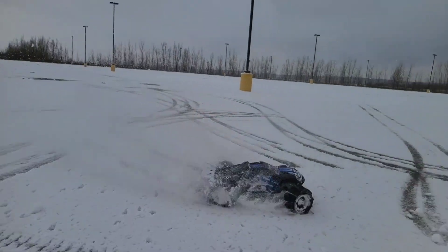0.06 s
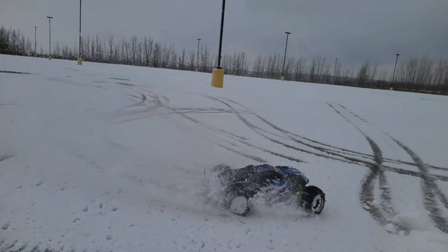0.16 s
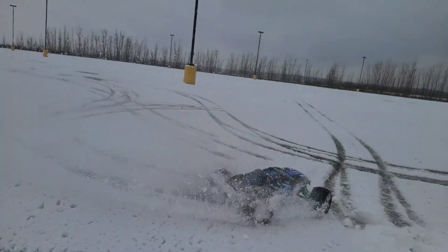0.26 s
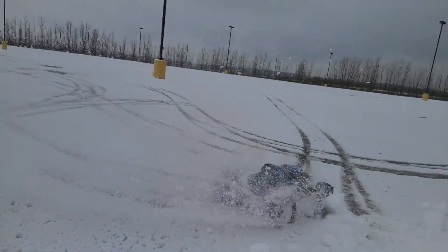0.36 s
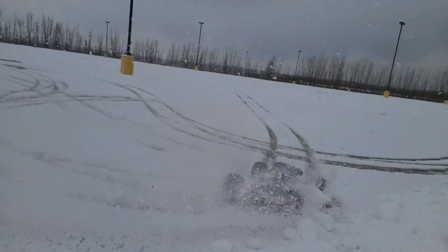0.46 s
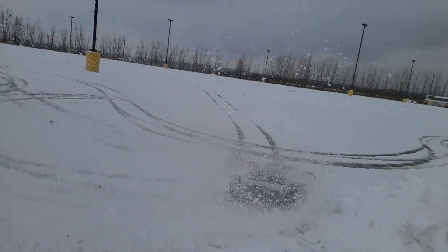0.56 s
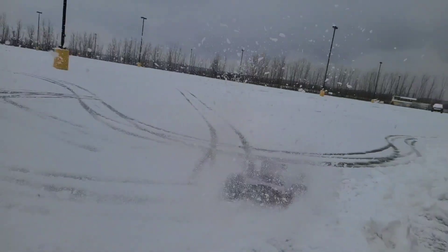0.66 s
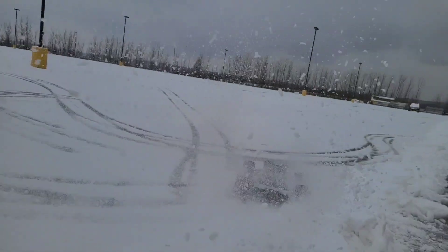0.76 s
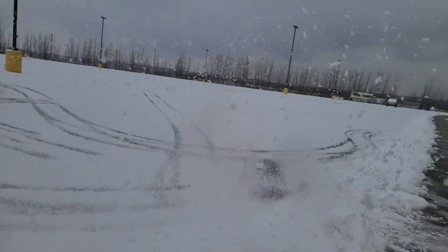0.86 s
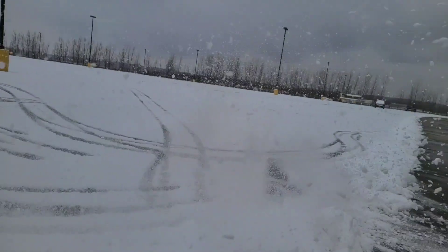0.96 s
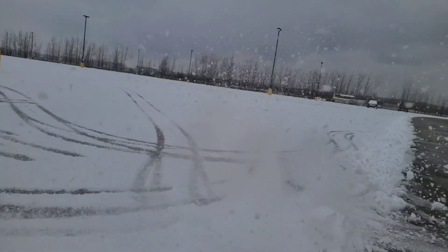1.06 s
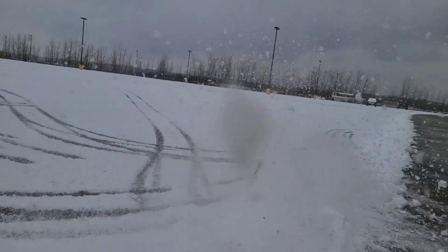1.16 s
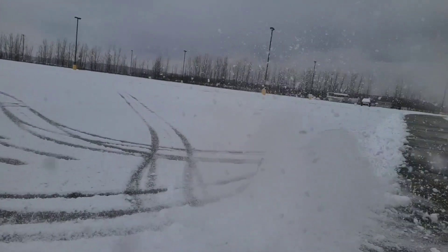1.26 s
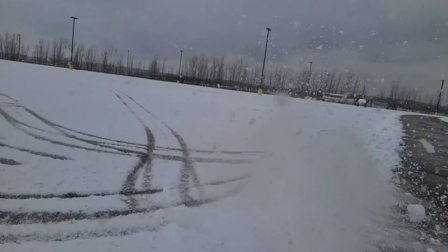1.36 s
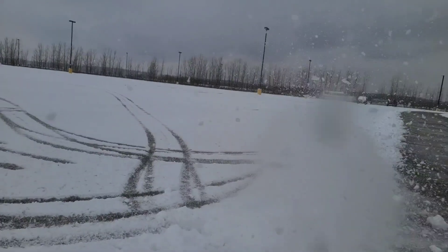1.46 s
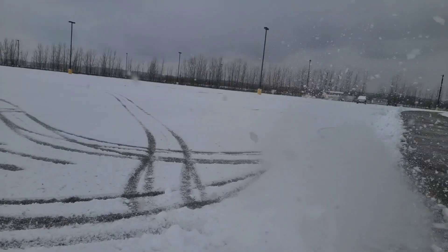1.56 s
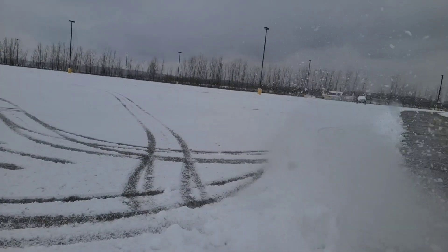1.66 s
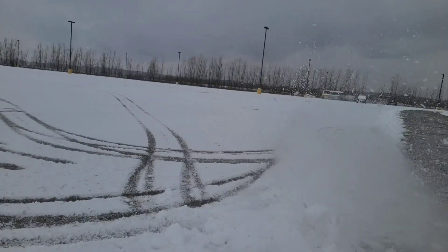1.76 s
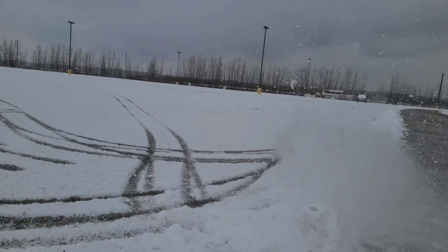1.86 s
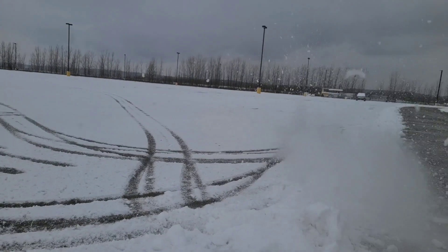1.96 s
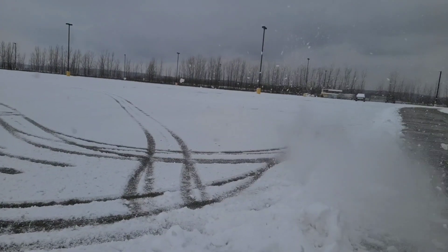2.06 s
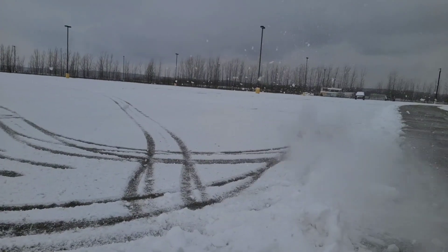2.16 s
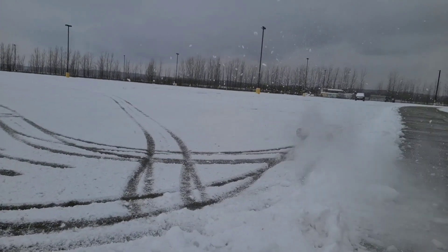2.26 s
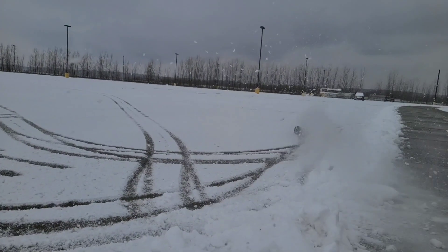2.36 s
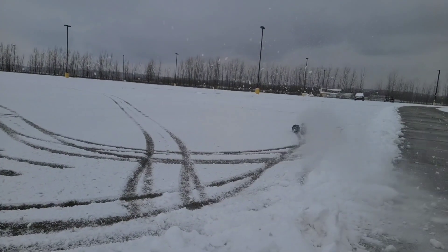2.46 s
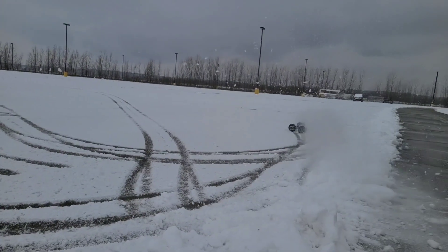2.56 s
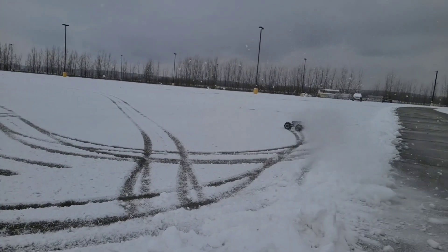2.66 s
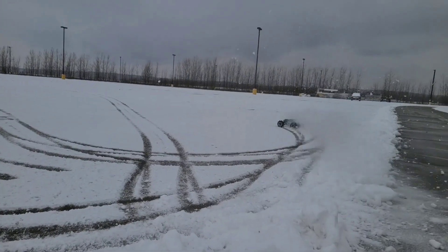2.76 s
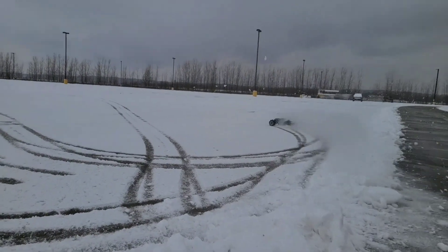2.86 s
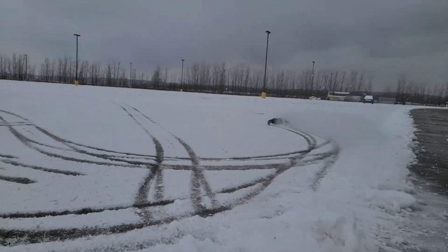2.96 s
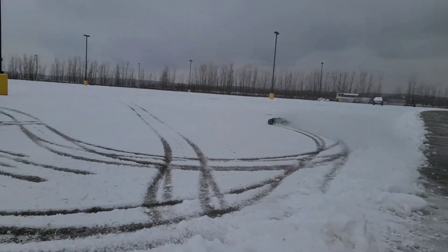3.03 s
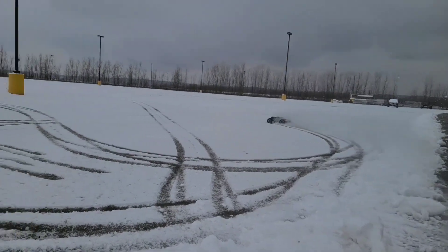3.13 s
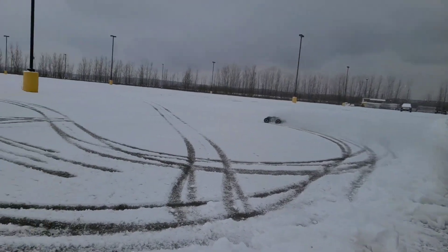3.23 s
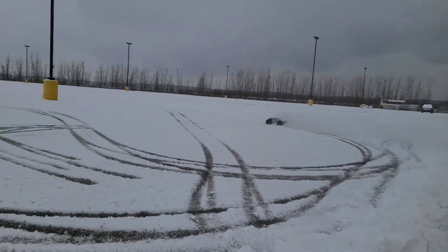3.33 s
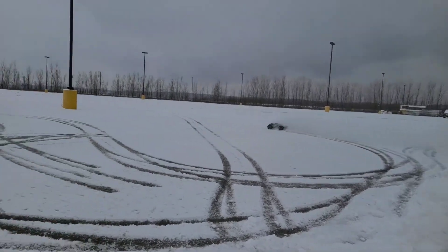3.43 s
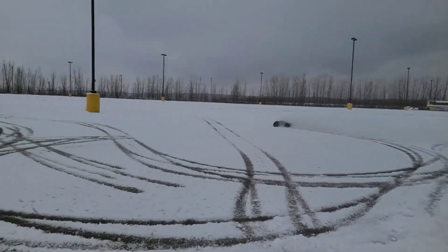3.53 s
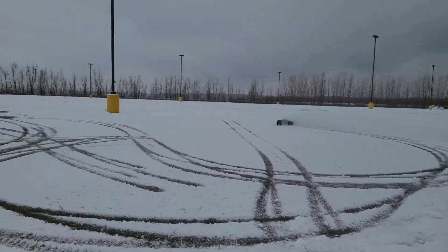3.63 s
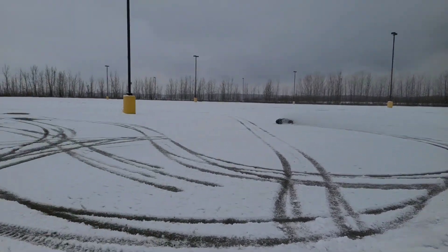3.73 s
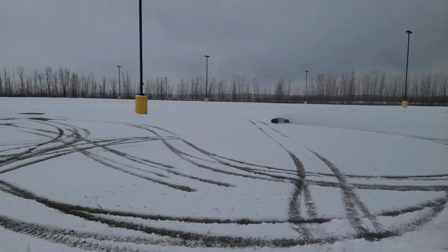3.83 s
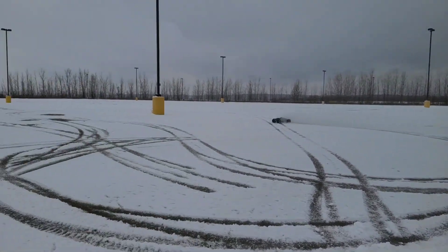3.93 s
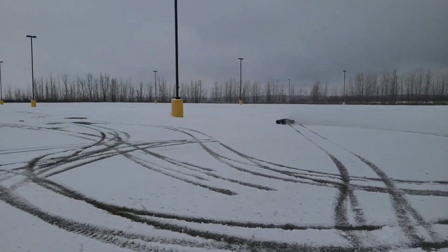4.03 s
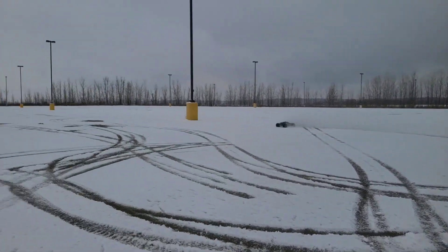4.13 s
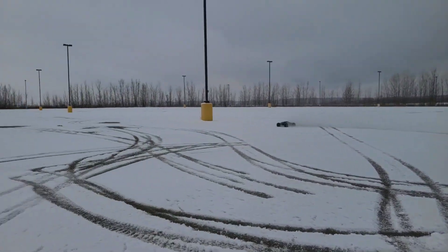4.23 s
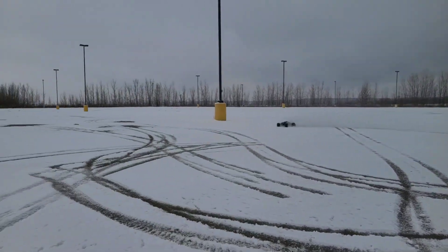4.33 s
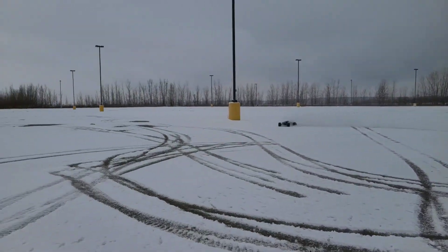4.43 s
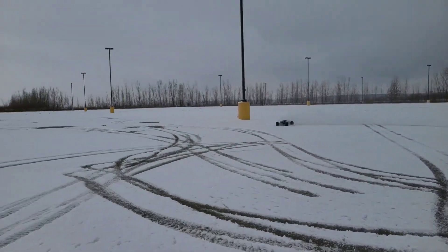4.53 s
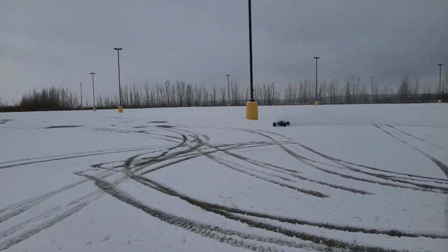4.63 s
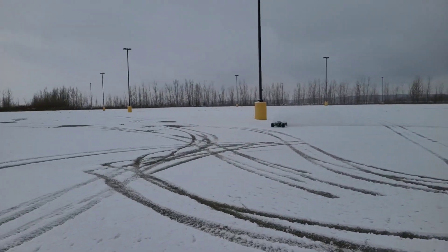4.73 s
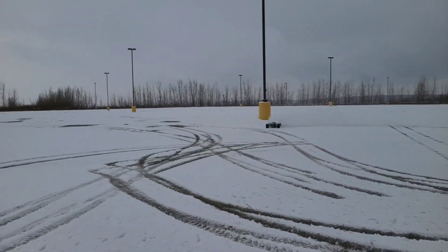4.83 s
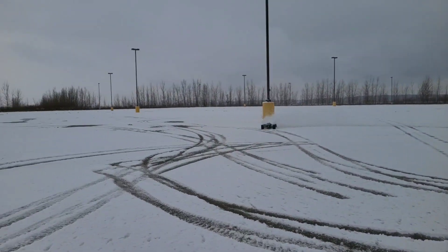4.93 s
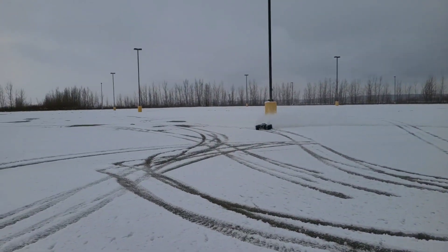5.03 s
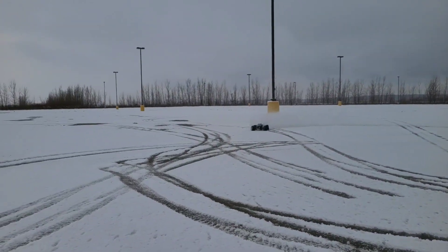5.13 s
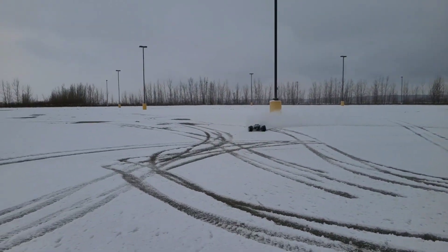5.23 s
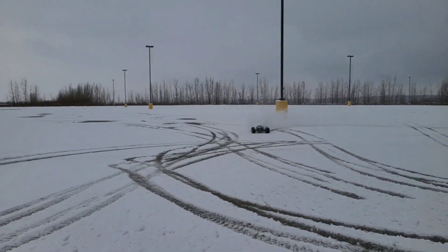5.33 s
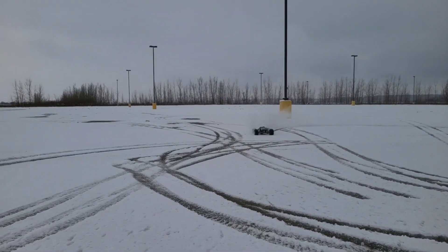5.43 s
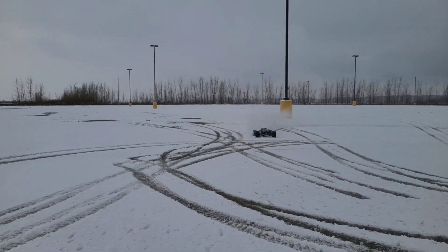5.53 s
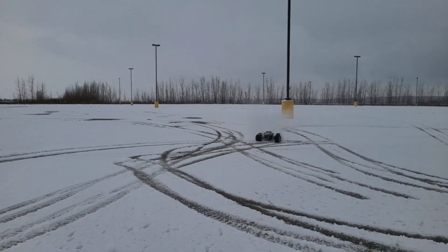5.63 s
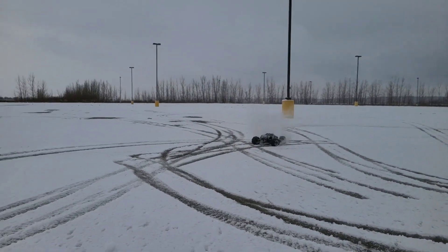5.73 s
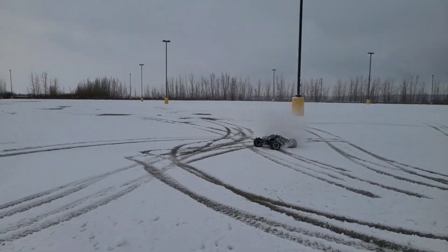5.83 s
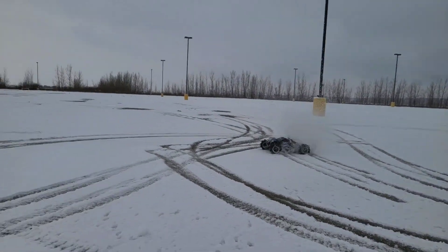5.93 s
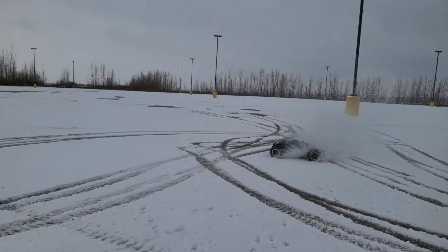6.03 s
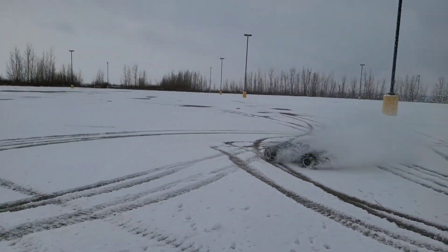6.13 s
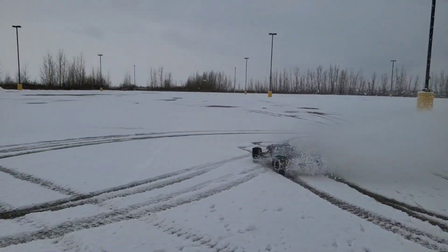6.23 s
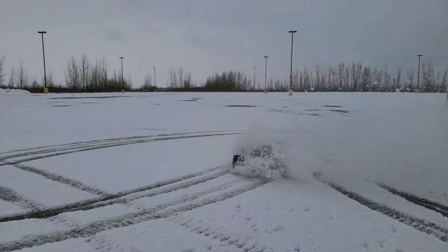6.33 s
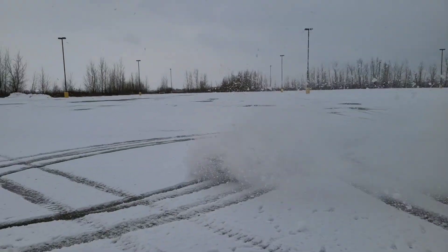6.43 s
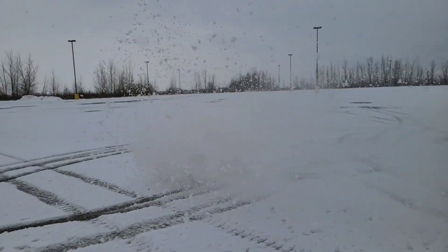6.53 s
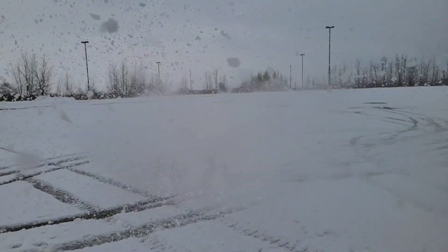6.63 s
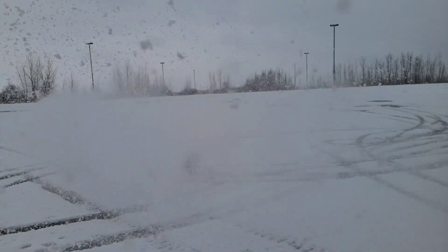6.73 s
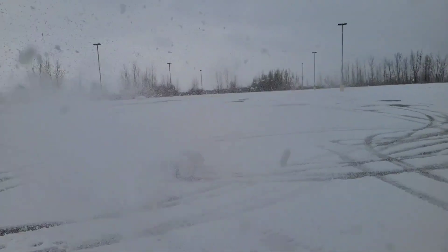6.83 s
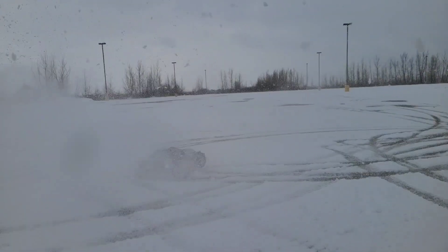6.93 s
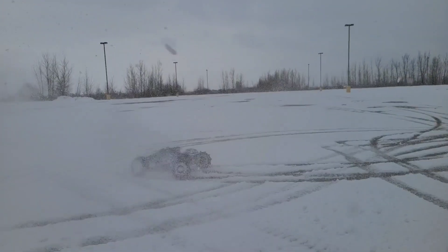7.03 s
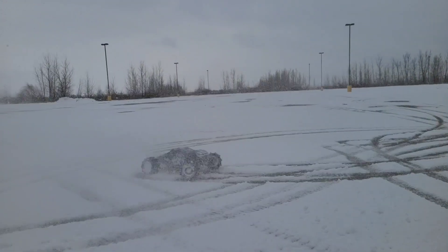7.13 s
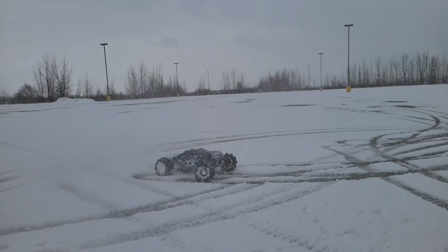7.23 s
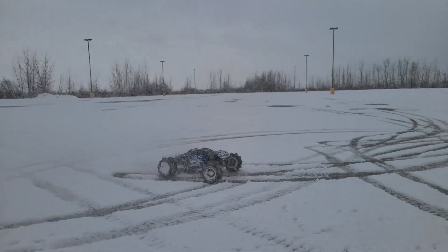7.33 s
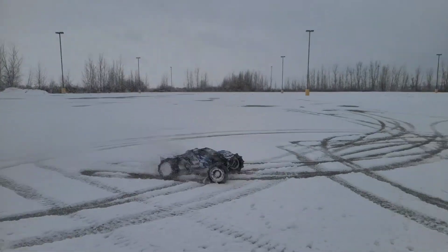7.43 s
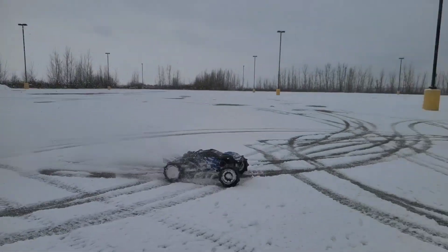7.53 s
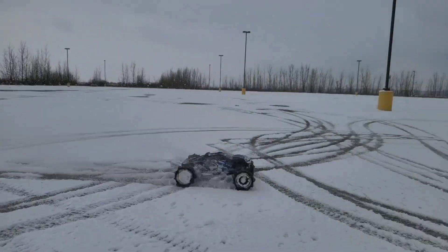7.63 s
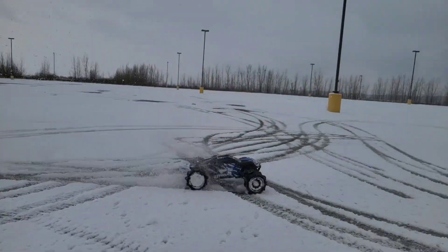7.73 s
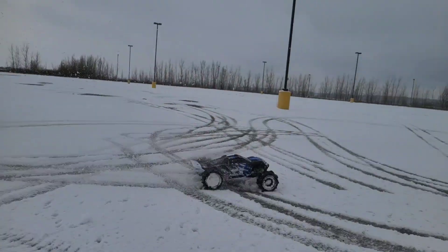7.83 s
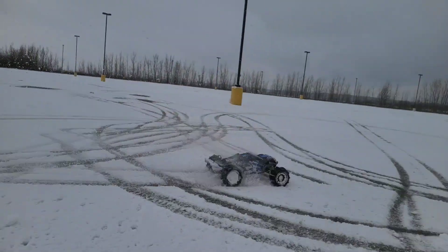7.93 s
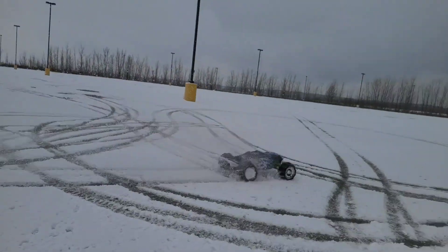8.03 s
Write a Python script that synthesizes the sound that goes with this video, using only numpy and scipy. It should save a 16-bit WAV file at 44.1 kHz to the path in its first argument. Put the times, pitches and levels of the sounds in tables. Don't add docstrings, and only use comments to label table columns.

```python
import sys
import numpy as np
from scipy import signal
from scipy.fft import rfft, irfft, next_fast_len
from scipy.io import wavfile
from scipy.ndimage import uniform_filter1d, map_coordinates

SR = 44100
rng = np.random.default_rng(int(sys.argv[2]) if len(sys.argv) > 2 else 0)


def decibels_to_gain(level_db):
    exponent = np.asarray(level_db, float) / 20
    return 10 ** exponent


def file_out(sig):
    cols = np.atleast_2d(sig).T
    lim = np.clip(cols, -1, 1)
    pcm = np.round(lim * 32767).astype(np.int16)
    wavfile.write(sys.argv[1], SR, pcm)


N = 356769
TIME = np.arange(N) / SR
TOP_HZ = 23500

# (time [s], nearness [dB], tyre bite [dB], facing [-1 away to 1 toward])
DRIVE = [(0, -29.5, -2.5, 0.81), (.45, -31, 1, 0.76), (.75, -33, 6.5, 0.53), (1.05, -34.5, 6, 0.14),
         (1.4, -33.5, -7, -1.04), (2, -38, -3, -0.72), (2.6, -44.5, 0, -1.24), (3.07, -47.5, 8.5, 0.024),
         (3.38, -48.5, 1.5, 0.14), (3.6, -49.5, -2.5, 0.5), (4.4, -46, -8, 0.99), (5.2, -43.5, -3.5, 1),
         (6.1, -35.5, 0, 0.23), (6.55, -34.5, 7.5, 0.4), (6.95, -29.5, 8.5, 0.51), (7.5, -33.5, 5, 0.35),
         (7.78, -31.5, -1, 0.83), (8.09, -29.5, -8.5, .66)]


def unit(x):
    return x / np.sqrt(np.mean(x ** 2) + 1e-20)


def along(points, hz):
    f, v = np.transpose(points)
    return np.interp(np.log(hz + 1), np.log(f + 1), v)


def curves(rows):
    s, *cols = np.transpose(rows)
    return [np.interp(TIME, s, c) for c in cols]


def wobble(rate):
    knots = rng.standard_normal(int(N * rate / SR) + 4)
    return map_coordinates(knots, [np.arange(N) * rate / SR])


def filtered(x, response):
    m = next_fast_len(N + 8192)
    return irfft(rfft(x, m) * response(np.fft.rfftfreq(m, 1 / SR)), m)[..., :N]


def shape(points):
    return lambda hz: decibels_to_gain(along(points, hz))


def modes(rows, order):
    def gain(f):
        power = 0
        for c, w, db in rows:
            resonance = np.abs(f * w / (c * c - f * f + 1j * f * w))
            power = power + decibels_to_gain(2 * db) * resonance ** (2 * order)
        return np.sqrt(power)
    return gain


def rush(gain, speed, patchy_db, grain_db, grain_rate):
    # (frequency [Hz], left-right likeness [0-1])
    alike = [(40, 0.25), (120, 1), (600, 0.94), (1200, 0.9), (2200, 0.45), (3500, 0.061), (6000, 0.22),
             (10000, 0.076), (16000, 0.07)]
    z = signal.stft(rng.standard_normal((2, N)), nperseg=512)[2]
    field = uniform_filter1d(rng.standard_normal(z.shape[1:]), size=3, axis=0)
    field = uniform_filter1d(field, size=round(4 / speed), axis=1)
    pair = signal.istft(z * decibels_to_gain(patchy_db * unit(field)), nperseg=512)[1][:, :N]
    pair = pair * decibels_to_gain(grain_db * wobble(grain_rate * speed))

    def colour(hz):
        angle = np.arccos(np.clip(along(alike, hz), -1, 1)) / 2
        return gain(hz) * (hz < TOP_HZ) * [np.cos(angle), np.sin(angle)]

    mid, side = filtered(pair, lambda hz: colour(hz / speed))
    return unit(np.array([mid + side, mid - side]))


def slowed(fade_s):
    start_s, end_s = .083, 3.088
    return np.clip(np.minimum(TIME - start_s, end_s - TIME) / fade_s + .5, 0, 1)


def swell(s, length):
    first = max(0, round((s - 2 * length) * SR))
    last = min(N, round((s + 2 * length) * SR))
    out, i = np.zeros(N), np.arange(first, last)
    out[i] = np.exp(-np.abs((i / SR - s) / (.6 * length)) ** 3)
    return out


def jolts():
    # (time [s], level [dB], length [s])
    ruts = [(0.045, 4, 0.02), (0.266, -9, 0.047), (0.336, -12, 0.014), (0.592, -2.5, 0.053),
            (1.192, 5.5, 0.031), (1.703, 7, 0.033), (2.32, 3.5, 0.2), (2.46, -1, 0.067),
            (2.536, 9.5, 0.021), (2.895, -7, 0.026), (2.93, 10, 0.057), (2.978, -12, 0.048),
            (3.032, 9, 0.048), (3.083, -25, 0.018), (3.106, 10, 0.015), (3.778, -5.5, 0.063),
            (4.487, 3.5, .05), (5.209, 2, 0.035), (5.664, 8, 0.029), (5.89, -4.5, 0.61), (6.751, -2, 0.28),
            (6.577, 5.5, 0.094), (7.022, 3.5, 0.086), (7.192, -5.5, 0.11), (7.385, 3.5, 0.087),
            (7.527, -2, 0.11), (7.706, 3, 0.084)]
    return sum(db * swell(s, length) for s, db, length in ruts)


def slides():
    # (start [s], end [s], strength [0-1])
    skids = [
        (-.1, 1.204, 1),
        (6.499, 7.348, 0.79),
    ]
    in_s, out_s = 0.022, 0.18
    return sum(g * np.clip(np.minimum((TIME - a) / in_s, (b - TIME) / out_s) + .5, 0, 1)
               for a, b, g in skids)


def part(db, near, bite, facing_db, jolt, air_db, air_s, slide_db):
    hop_s, flight_s = .86, .16
    scrabble_s, scrabble_db = 0.046, 20.5
    near_db, bite_db, facing = curves(DRIVE)
    reach = flight_s / 2 + scrabble_s
    scrabble = swell(hop_s - reach, 2 * scrabble_s) + swell(hop_s + reach, scrabble_s)
    bite_db = bite_db + scrabble_db * scrabble
    drive_db = near * (near_db + 32) + bite * bite_db + facing_db * facing
    return db + drive_db + jolt * jolts() + air_db * swell(hop_s, air_s) + slide_db * slides()


def bounced(x, speed, echo_db):
    # (time [s], delay at full speed [ms], strength [0-1])
    bounce = [(0, 1.3, .15), (3.0, 1.3, .15), (3.2, 1.26, .35), (4.6, 1.8, .3), (5.5, 1.58, .5),
              (6.1, 1.4, .75), (6.6, 1.33, .8), (7.0, 1.33, .6), (7.5, 1.33, .85), (8.09, 1.21, .75)]
    ms, strength = curves(bounce)
    delay = ms * SR / 1000 / speed * np.array([[.97], [1]]) * (1 + .015 * wobble(3))
    late = np.arange(N) - delay
    echo = np.array([map_coordinates(c, [i], mode="nearest") for c, i in zip(x, late)])
    return x - decibels_to_gain(echo_db) * np.clip(strength, 0, 1) * echo


def shell(speed, bumps):
    # (frequency [Hz], width [Hz], level [dB])
    lower_modes = [(197.8, 52, -1), (224.5, 66, 0.5), (132, 82, -11)]
    # (frequency [Hz], width [Hz], level [dB])
    upper_modes = [(397.7, 90, -1), (447, 63, 0.5), (340, 48, -3)]
    drum = rush(modes(lower_modes, order=2), speed, patchy_db=-1.5, grain_db=1.0, grain_rate=63)
    upper = rush(modes(upper_modes, order=2), speed, patchy_db=1.5, grain_db=3.0, grain_rate=95)
    drum_db = part(-23, near=0.66, bite=0.08, facing_db=0, jolt=0.86, air_db=-30, air_s=.072, slide_db=-1.5)
    drum_db = drum_db + 4.5 * slowed(0.035)
    upper_db = part(-23.5, near=0.81, bite=-0.17, facing_db=0.88, jolt=0.6,
                    air_db=-26, air_s=.165, slide_db=0.27)
    return decibels_to_gain(drum_db + 0.5 * bumps) * drum + decibels_to_gain(upper_db + 0.82 * bumps) * upper


def belly(speed, bumps):
    # (frequency [Hz], width [Hz], level [dB])
    plate = [(245, 51, -0.5), (342, 134, -3.5), (560, 105, -14)]
    noise = rush(modes(plate, order=2), speed, patchy_db=1.0, grain_db=1.5, grain_rate=90)
    db = part(-44.5, near=0.19, bite=0.32, facing_db=0, jolt=1, air_db=-30, air_s=.072, slide_db=20.6)
    return decibels_to_gain(db + 0.33 * bumps) * noise


def churn(speed, bumps):
    # (frequency [Hz], level per Hz [dB])
    snow = [(450, -43), (700, -2), (900, -4), (1180, -1.5), (1350, -2.5), (1900, -10.5), (3000, -18),
            (4200, -30)]
    noise = rush(shape(snow), speed, patchy_db=1.5, grain_db=2.2, grain_rate=150)
    db = part(-35.5, near=1, bite=1, facing_db=-1, jolt=0.02, air_db=-15.5, air_s=0.3, slide_db=1)
    return bounced(decibels_to_gain(db + .7 * bumps) * noise, speed, echo_db=-2.5)


def slush(speed, bumps):
    # (frequency [Hz], level per Hz [dB])
    wet_snow = [(380, -12), (560, 3), (680, -2), (780, -11), (1300, -26.5), (4200, -69)]
    noise = rush(shape(wet_snow), speed, patchy_db=1.5, grain_db=-0.5, grain_rate=170)
    db = part(-32, near=0.99, bite=0.5, facing_db=9.85, jolt=0.041,
              air_db=-26, air_s=.165, slide_db=-1.46)
    return bounced(decibels_to_gain(db + .7 * bumps) * noise, speed, echo_db=-5)


def powder(speed, bumps):
    # (frequency [Hz], level per Hz [dB])
    fine_snow = [(1200, -23), (1800, 5), (2600, 2), (3450, -2), (3900, -9), (6000, -46)]
    noise = rush(shape(fine_snow), speed, patchy_db=0.5, grain_db=3.0, grain_rate=310)
    db = part(-47, near=0.5, bite=0.5, facing_db=-7.5, jolt=0.2, air_db=-5.5, air_s=0.4, slide_db=14.5)
    return bounced(decibels_to_gain(db + 1.5 * bumps) * noise, speed, echo_db=-2.5)


def gears_and_spray(speed, bumps):
    # (frequency [Hz], width [Hz], level [dB])
    gearbox = [(1330, 560, 5.5), (1930, 950, 5.5), (3000, 220, -3), (3670, 1740, 0), (5620, 1720, -0.5),
               (7540, 1270, -4.5), (12000, 3400, -8.5)]
    # (frequency [Hz], level per Hz [dB])
    thrown = [(3000, -5), (7000, 3.5), (8200, -10.5), (10000, -1), (11600, 2.5), (14000, 0.5), (16000, 1.5),
              (18800, 6.5), (20200, -3), (21800, 4), (22800, -8)]
    wheel = np.cos(2 * np.pi * np.cumsum(38 * speed * (1 + 0.106 * wobble(6 * speed))) / SR)
    gears = rush(modes(gearbox, order=2), speed, patchy_db=3.5, grain_db=2.0, grain_rate=280)
    spray = rush(shape(thrown), speed, patchy_db=3.0, grain_db=2.5, grain_rate=540)
    gears_db = part(-34, near=1, bite=0, facing_db=0, jolt=.15, air_db=-5, air_s=.12, slide_db=0)
    spray_db = part(-38.5, near=0.64, bite=-0.0328, facing_db=1.5, jolt=-0.08,
                    air_db=0, air_s=0.43, slide_db=-1)
    high = decibels_to_gain(gears_db + 0.94 * wheel + 0.6 * bumps) * gears
    high += decibels_to_gain(spray_db + 1.3 * wheel + 1.0 * bumps) * spray
    return bounced(high, speed, echo_db=-2.5)


def mesh():
    # (time [s], throttle [dB], mesh frequency at full speed [Hz], warble depth [1])
    pinion = [(0, -4.5, 5580, 1.3), (.45, -1, 5490, 1.34), (.75, -26, 5400, 0.79), (1.4, -34, 5560, 1),
              (1.95, -6, 5675, 1.27), (2.5, 1.5, 5560, 1.4), (3.07, -0.5, 5620, 1.4), (3.4, -4, 5580, 1.1),
              (4.4, -0.5, 5525, 1.28), (5.0, 0.5, 5440, 1.16), (5.5, -7, 5780, 1.15), (5.66, 3, 5630, 0.18),
              (6.04, 0.5, 5870, 0.62), (6.18, -4, 5460, 1.3), (6.9, -9.5, 5620, 1.1),
              (7.35, -4, 5850, 0.704), (7.64, -2, 5900, 0.48), (7.85, -2.5, 5780, 0.91),
              (8.03, -2.5, 5560, 0.34)]
    # (time [s], load [dB], frequency at full speed [Hz])
    axle = [(0, -10, 3624), (.45, -13, 3640), (.8, -18, 3670), (2, -18.5, 3820), (3.08, -8.5, 3815),
            (3.5, -13, 3430), (4.2, -15, 3637), (5.0, -7.5, 3710), (5.5, -9.5, 3708), (6.15, -15, 3730),
            (6.5, -9, 3636), (6.9, -12, 3370), (7.3, -38, 3500), (7.55, -8.5, 3470), (7.78, -31, 3576),
            (8.0, -23, 3790)]
    # (time [s], rate at full speed [turns/s])
    rotation = [(0, 41), (.5, 41), (1.2, 38), (3.1, 42), (3.6, 39), (4.2, 43.5), (4.8, 39), (6.5, 39),
                (6.8, 37.4), (8.09, 36.2)]
    # (frequency ratio [1], level [dB])
    strands = [(.93, -19), (1.075, -17)]
    warble, spin_warble, spin_s = .036, .07, .5
    smear, steady = .02, 0.66
    near_db = curves(DRIVE)[0]
    throttle_db, hz, depth = curves(pinion)
    load_db, axle_hz = curves(axle)
    slow = slowed(0.0046)
    fresh = np.exp(-TIME / spin_s)
    speed = 1 - slow / 2
    spin = spin_warble * fresh
    rate = curves(rotation)[0] * speed * (1 + .04 * (1 - fresh) * wobble(6.8))
    wheel = 2 * np.pi * (.73 + np.cumsum(rate) / SR)
    surge = 1 + .5 * np.sqrt(fresh) * np.cos(2 * np.pi * (TIME - .275) / .175)
    uneven = decibels_to_gain((3 - slow) * (1 - fresh) * wobble(12))
    bend = (.5 + .45 * slow) * np.sin(wheel) * surge * uneven + (.5 - .3 * slow) * wobble(30)

    def phase(pitch, share):
        swing = (share * warble + spin) * bend + smear * speed * share * wobble(500)
        return 2 * np.pi * np.cumsum(pitch * speed * (1 + swing)) / SR

    # (frequency [Hz], level [dB], share of warble [1], burst [dB])
    tones = [(hz, throttle_db - 4.0, depth, 6 - 4 * slow),
             (2.07 * hz, throttle_db - 10, depth, 5),
             (axle_hz, load_db - 1, steady, 7),
             (axle_hz / 2, load_db + 7 * slow - 2 * fresh, steady, 4 + 5 * fresh)]
    for ratio, db in strands:
        strand_db = throttle_db + db + 9 * depth - 8 * slow + 3 * wobble(2.92)
        tones.append((ratio * hz, strand_db, .4, 6))
    out = np.zeros((2, N))
    for pitch, tone_db, share, burst_db in tones:
        flutter_db = burst_db * np.sin(wheel - 1.3 + 1.5 * (1 - fresh) * wobble(2))
        flutter_db = flutter_db + 1.5 * wobble(7) + 1.2 * slow * wobble(45)
        flutter_db = flutter_db + 2.5 * np.array([wobble(50), wobble(50)])
        drift = 0.56 * np.array([wobble(30), wobble(30)])
        out += decibels_to_gain(near_db + tone_db + flutter_db) * np.sin(phase(pitch, share) + drift)
    return out


def road(speed):
    # (frequency [Hz], level per Hz [dB])
    far_road = [(15, -32), (40, -25), (56, -10), (75, -11), (120, -15.5), (300, -16), (1000, -27),
                (3000, -93)]
    note = np.sin(2 * np.pi * np.cumsum(56 * speed * (1 + 0.0484 * wobble(5 * speed))) / SR)
    drone = rush(shape(far_road), speed, patchy_db=4.5, grain_db=-4.0, grain_rate=11)
    return decibels_to_gain(-37.5) * drone + decibels_to_gain(-40 + 2.2 * wobble(5 * speed)) * note


def ticks(rows, life):
    out, t = np.zeros((2, N + SR)), np.arange(512) / SR
    chance = rng.standard_normal((len(rows), 2, 512))
    band = signal.butter(3, [1900, 12500], "band", fs=SR, output="sos")
    for (s, db, hz, pan_db), noise in zip(rows, chance):
        crack = signal.sosfilt(band, noise)
        ring = np.sin(2 * np.pi * hz * (t - np.array([[0], [.00025]])))
        envelope = (1 - np.exp(-t / (0.2 * life))) * np.exp(-t / life)
        burst = envelope * (0.5 * ring + 0.5 * crack)
        out[:, round(s * SR):][:, :512] += decibels_to_gain(db + 2.0 + pan_db * np.array([[.5], [-.5]])) * burst
    return out[:, :N]


def whine():
    # (time [s], frequency [Hz], level [dB])
    free_motor = [
        (0.8, 940, -50),
        (0.84, 975, -33),
        (0.92, 1045, -33),
        (0.976, 990, -31),
        (1.026, 1004, -48),
        (1.036, 950, -44),
        (1.1, 1020, -47),
    ]
    first, last = free_motor[0], free_motor[-1]
    faded = [(first[0] - .03, first[1], -80)] + free_motor + [(last[0] + .05, last[1], -80)]
    hz, db = curves(faded)
    phase = 2 * np.pi * np.cumsum(hz * (1 + 0.0064 * wobble(59.7))) / SR
    beat_db = 3 * np.cos(2 * np.pi * 28 * TIME + 1.4)
    tone = np.sin(phase) + decibels_to_gain(-17) * np.sin(3 * phase)
    return decibels_to_gain(db + 9.5 + beat_db + 1.8 * wobble(54.0)) * tone * np.ones((2, 1))


def knocks():
    # (time [s], level [dB], playing speed [1])
    lumps = [
        (1.516, -23.5, .5),
        (5.52, -22, 0.94),
    ]
    # (frequency [Hz], level [dB], decay by 60 dB [s])
    grip = [(840, -4, 0.061), (1930, 1.5, 0.068), (2610, 22.5, 0.0071), (4120, -2, 0.015)]
    out = np.zeros(N + SR)
    for s, db, speed in lumps:
        t = np.arange(SR // 4) / SR * speed
        ring = np.zeros(len(t))
        for hz, level, t60 in grip:
            scatter_db = rng.normal(0, 1.5)
            ring += decibels_to_gain(level + scatter_db - 60 * t / t60) * np.sin(2 * np.pi * hz * t)
        thud = 4 * decibels_to_gain(-60 * t / 0.0085) * rng.standard_normal(len(t))
        out[round(s * SR):][:len(t)] += decibels_to_gain(db) * (ring + thud) * (1 - np.exp(-t / 0.0032))
    return out[:N]


def scuffs():
    # (time [s], peak level [dB], length [s])
    rubs = [
        (2.637, -54, 0.052),
        (3.797, -43.5, 0.024),
        (4.08, -36.5, 0.038),
        (4.457, -39.5, 0.038),
        (4.783, -39, 0.047),
        (5.017, -47, 0.033),
        (5.723, -39.5, 0.043),
    ]
    # (frequency [Hz], level per Hz [dB])
    glove = [(300, -43), (800, 13), (1300, -5), (2100, 2.5), (3000, -10), (3400, -32), (8000, -50)]
    envelope = sum(decibels_to_gain(db + 3.0) * np.exp(-((TIME - s - 0.37 * length) / (0.61 * length)) ** 2)
                   for s, db, length in rubs)
    return envelope * rush(shape(glove), 1.0, patchy_db=3.5, grain_db=-0.5, grain_rate=200)


def scrub(speed, bumps):
    # (frequency [Hz], width [Hz], level [dB])
    tyre = [(1135, 120, 2), (1255, 59, -4)]
    # (time [s], level [dB])
    far_turn = [
        (2.8, -75),
        (3.08, -47),
        (3.25, -48),
        (3.47, -50),
        (3.8, -59),
        (4.3, -80),
    ]
    noise = rush(modes(tyre, order=2), speed, patchy_db=1.5, grain_db=1.5, grain_rate=90)
    return decibels_to_gain(curves(far_turn)[0] + .8 * bumps) * noise


def truck(speed, motor):
    bumps = wobble(40 * speed)
    low = shell(speed, bumps) + belly(speed, bumps)
    snow = churn(speed, bumps) + slush(speed, bumps) + powder(speed, bumps) + scrub(speed, bumps)
    return low + snow + gears_and_spray(speed, bumps) + bounced(motor, speed, echo_db=-5)


def ports(x, speed):
    # (frequency [Hz], lead of the left port [samples])
    lead = [(100, 2.5), (700, 0.95), (1500, 9.4), (20000, 9.44)]

    def response(hz):
        angle = np.pi * hz / speed * along(lead, hz / speed) / SR
        return np.exp(1j * angle * np.array([[1], [-1]]))

    return filtered(x, response)


def scene():
    # (time [s], peak level [dB], ring frequency [Hz], left-right difference [dB])
    crumbs_slow = [(1.1083, -4.5, 5520, -6), (1.122, -3.5, 10450, 1), (1.1573, -10, 9700, 1),
                   (1.1712, -6.5, 9500, -15), (1.179, -6, 8100, -4), (1.2066, -17, 5430, -9),
                   (1.247, -6, 7260, -7), (1.2503, -10, 6630, -18), (1.2642, -12, 6000, 10),
                   (1.299, -23, 3630, -3), (1.3705, -8.5, 5700, -11), (1.3822, -14, 5000, -10),
                   (1.4552, -14, 6000, -10), (1.4795, -12.5, 9050, -29), (1.4884, -17, 5850, -11),
                   (1.5152, -15.5, 7700, 14), (1.5406, -15, 9260, -3), (1.6112, -16.5, 5250, -9),
                   (1.6664, -16, 9600, -5.0), (1.7015, -19, 10660, 10), (1.9053, -20, 6470, -21.5),
                   (1.9749, -7, 9900, -6), (2.206, -35, 8830, 2), (2.2528, -13.5, 10200, -11),
                   (2.2571, -13, 2580, -15), (2.602, -22, 9700, -16), (2.7963, -6.5, 3670, 22),
                   (2.9041, -21, 10200, 10)]
    # (time [s], peak level [dB], ring frequency [Hz], left-right difference [dB])
    crumbs_full = [(3.218, -31, 5500, 2), (4.102, -27, 11400, -2), (3.6892, -25, 5720, 2),
                   (4.6136, -20.5, 5710, -14), (4.6414, -21, 5180, -1), (4.9483, -23, 5200, -3),
                   (5.1512, -24, 6070, -4), (5.5175, -10, 6440, -14), (5.526, -13.5, 2970, -7),
                   (6.1439, -16, 3840, 3), (6.6418, -16, 3208, 2), (6.9765, -42, 5620, -7),
                   (7.0542, -16, 7280, 16), (7.0793, -13, 5570, -10), (7.0864, -7.5, 5900, 11),
                   (7.1402, -6.5, 5040, -8), (7.9212, -15, 2700, 4)]
    # (time [s], peak level [dB], ring frequency [Hz], left-right difference [dB])
    splats = [
        (.7084, -19.5, 8760, 13),
        (1.0722, -12.5, 8740, 0),
        (1.2987, -17, 9400, -2),
        (1.322, -24, 7500, -4),
        (1.3895, -20, 9000, 0),
        (1.5172, -16, 8000, 13),
    ]
    slow = slowed(.02)
    motor = mesh() + whine()
    hand = (scuffs() + knocks()) * decibels_to_gain([[-4], [2.5]])
    half = ports(truck(.5, motor) + road(0.32) + hand, 0.49)
    half = half + ticks(crumbs_slow, life=0.00089) + ticks(splats, life=0.0023)
    full = ports(truck(0.95, motor) + road(0.99) + hand, 0.92) + ticks(crumbs_full, life=0.0011)
    half = filtered(half, lambda hz: np.clip((TOP_HZ / 2 + 50 - hz) / 350, 0, 1) ** 2)
    return (np.sqrt(slow) * half + (1 - slow) * full) * decibels_to_gain([[-.45], [.45]])


def top_cut(x):
    return signal.sosfilt(signal.butter(12, 17010, fs=SR, output="sos"), x)


def record(dry):
    soft = dry / (1 + np.abs(dry / .98) ** 6) ** (1 / 6)
    mix = filtered(soft, lambda hz: hz < 15850)
    return top_cut(mix)


dry = scene()
out = record(dry)
file_out(out)
```